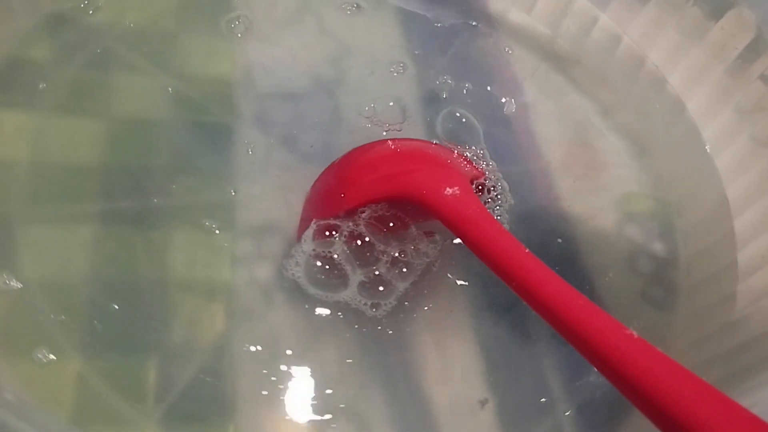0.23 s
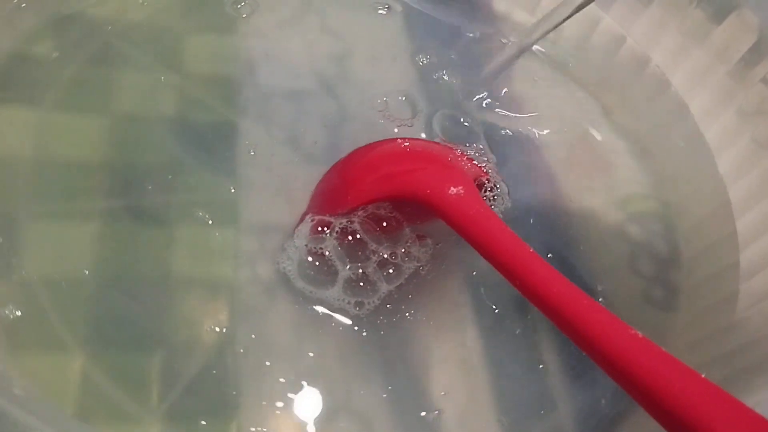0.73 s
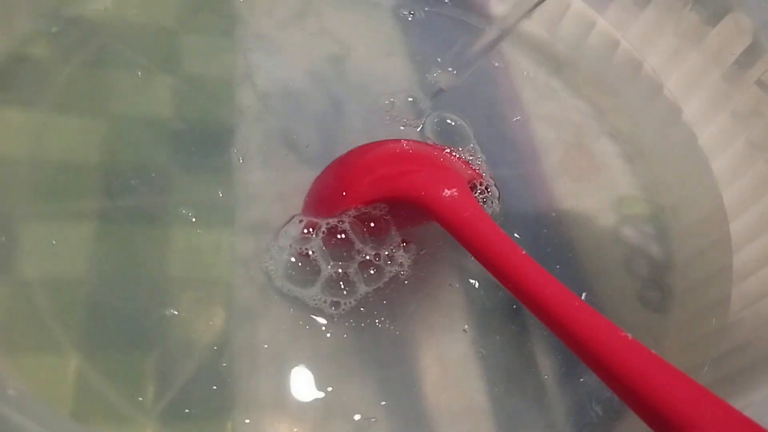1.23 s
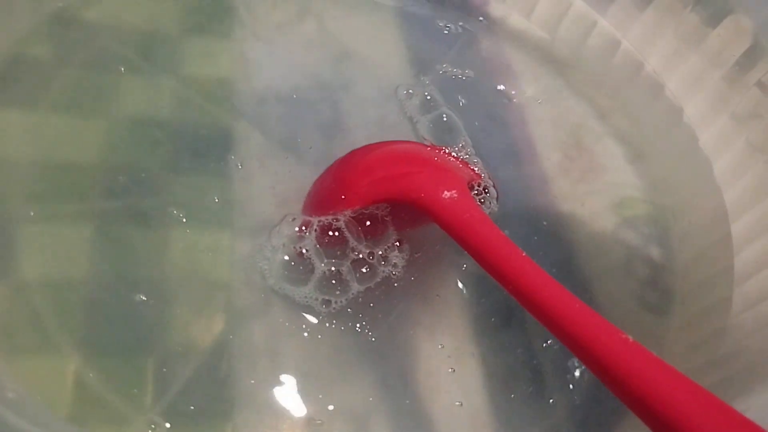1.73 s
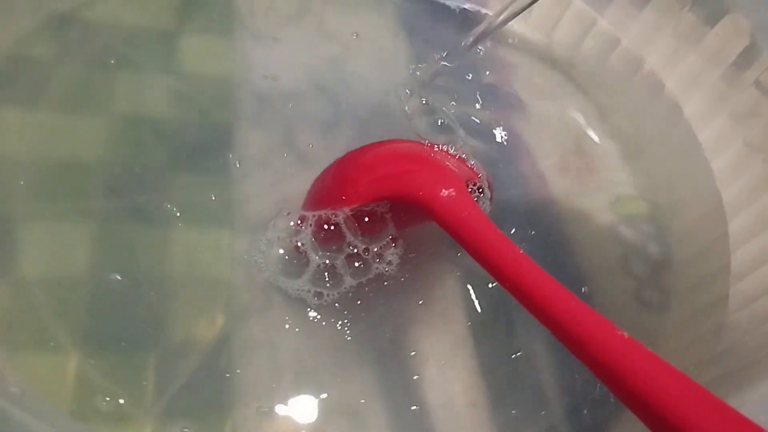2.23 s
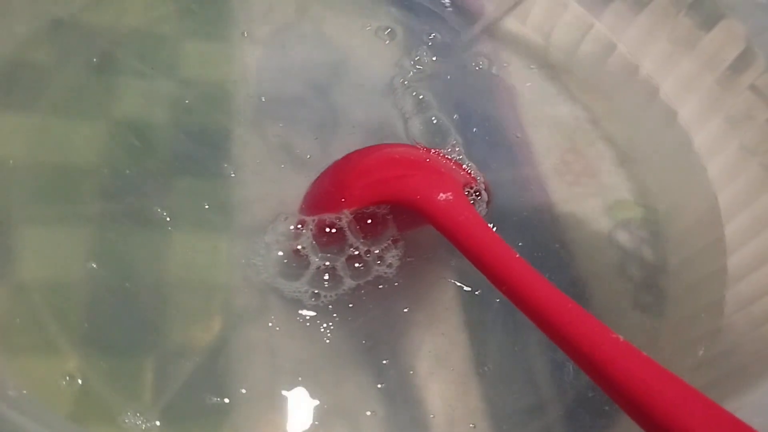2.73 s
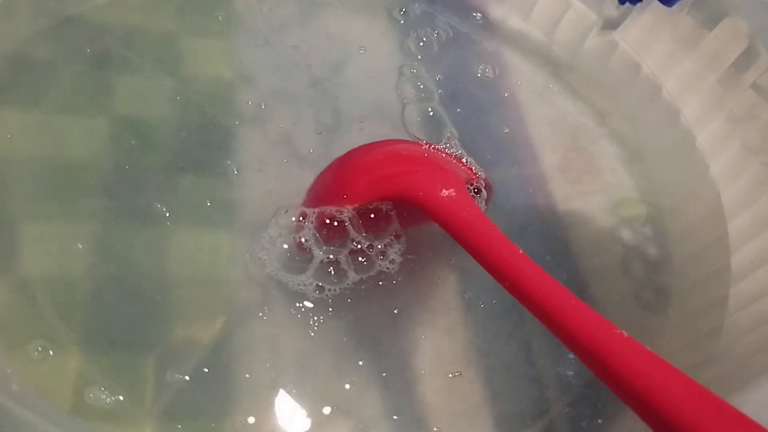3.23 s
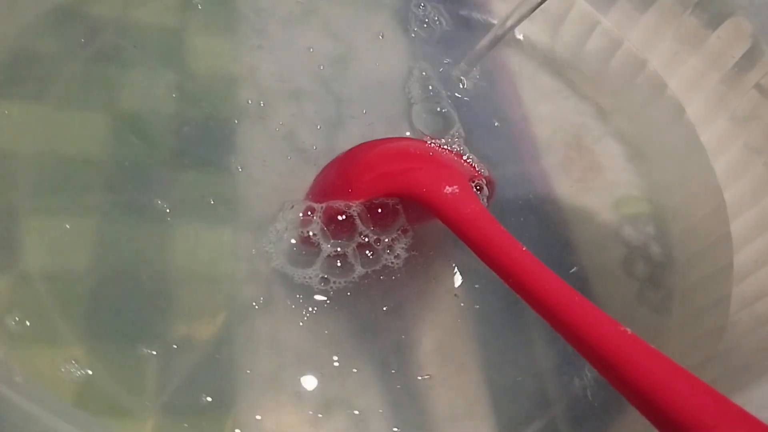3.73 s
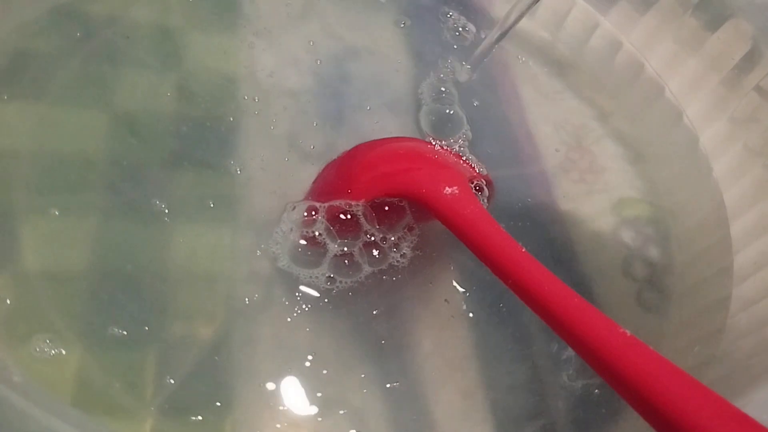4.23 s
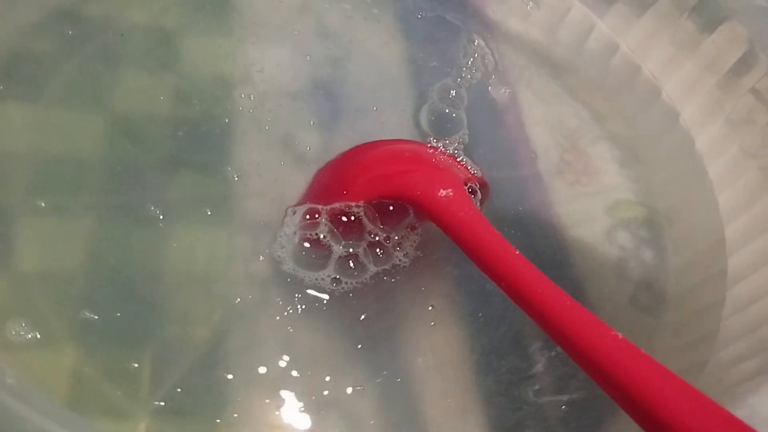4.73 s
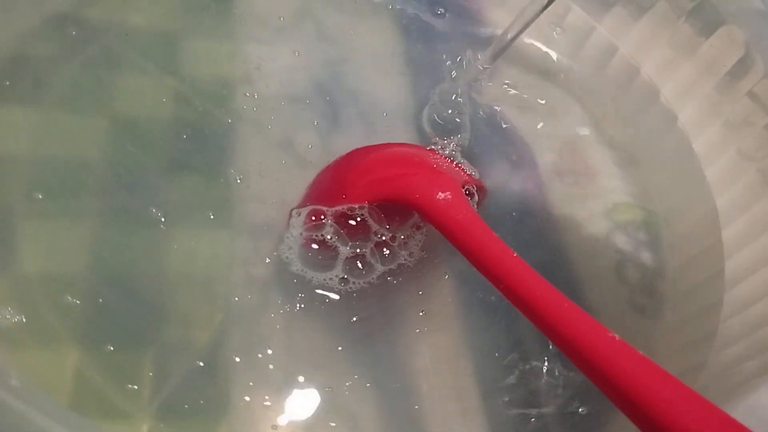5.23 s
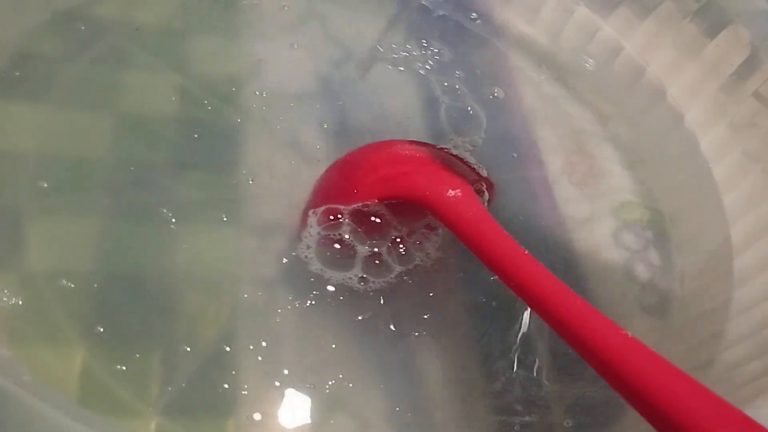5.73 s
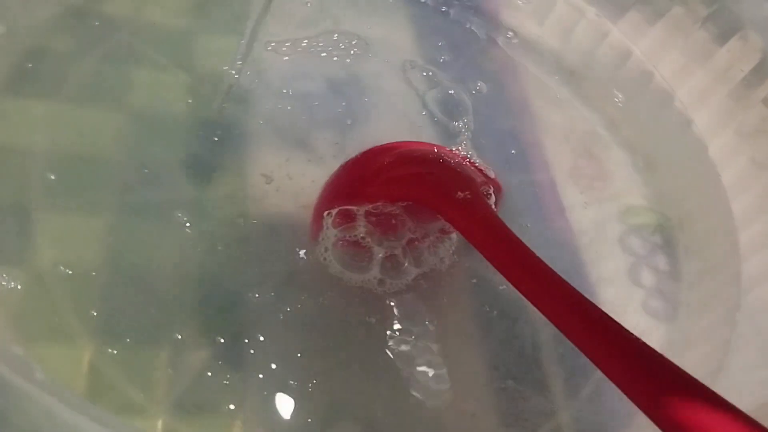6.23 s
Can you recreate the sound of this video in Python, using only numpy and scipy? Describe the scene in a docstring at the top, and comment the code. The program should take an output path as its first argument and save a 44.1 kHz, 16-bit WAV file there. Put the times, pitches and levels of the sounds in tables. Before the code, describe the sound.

Close to the microphone in a small kitchen, a plastic bottle is squeezed again and again. Its wall snaps in and out with sharp single clicks and short crumpling runs. In the first half a faint, high whistle comes from the nozzle at times, and there are a couple of low watery gulps. Tiny bubbles pop on the water, more often later, over very faint fizz, room air and a distant fridge hum.

```python
"""Faint room air, the far hum of a fridge and fizzing foam are heard throughout. Over them a plastic
bottle is squeezed close to two microphones in a small kitchen, at times with a thin nozzle whistle:
dents in its wall buckle in and out, singly and in crumpling runs, and set its modes ringing.
Bubbles burst on the water, pockets of air ring in it, and the kitchen adds a short reverberation."""
import sys
import numpy as np
from scipy import signal
from scipy.fft import rfft, irfft
from scipy.io import wavfile
from scipy.ndimage import uniform_filter1d

SR = 44100
rng = np.random.default_rng(int(sys.argv[2]) if len(sys.argv) > 2 else 0)


def bounce(signal):
    """Save signal as a 16-bit WAV file at the path given by the first command-line argument."""
    frames = np.transpose(np.atleast_2d(signal))
    limited = np.clip(frames, -1, 1)
    pcm = np.round(limited * 32767).astype(np.int16)
    wavfile.write(sys.argv[1], SR, pcm)


N = 286593


def amp(db):
    return 10 ** (np.asarray(db) / 20)


def unit_rms(x):
    return x / np.sqrt(np.mean(x ** 2) + 1e-20)


def curve_at(points, hz):
    """Interpolation along a logarithmic frequency axis."""
    f, value = np.transpose(points)
    return np.interp(np.log(hz + 1), np.log(f + 1), value)


def add(mix, start, sound):
    """Superposition: a sound joins the mix at its start in seconds."""
    part = mix[:, round(start * SR):][:, :sound.shape[1]]
    part += sound[:, :part.shape[1]]


def coloured(x, spectrum):
    """Spectral shaping of white signals, scaled to rms 1."""
    size = x.shape[-1]
    return unit_rms(irfft(rfft(x) * amp(curve_at(spectrum, np.fft.rfftfreq(size, 1 / SR))), size))


def wander(count, span):
    """Slow random modulation of rms 1: noise averaged twice over span samples."""
    return unit_rms(uniform_filter1d(uniform_filter1d(rng.standard_normal(count), span), span))


# Spectrum of the background. Each row: frequency in Hz, relative density in dB.
AIR_SPECTRUM = [(12, -30), (20, 17.5), (94, -23.5), (244, -9.5), (404, -19), (750, -21), (839, -25.5),
                (1510, -29.5), (3140, -27), (4050, -31), (5520, -29), (8170, -40), (9670, -64.5),
                (12500, -52.5), (15200, -42), (16500, -46.5)]
# Likeness of the channels. Each row: frequency in Hz, left-right correlation.
AIR_CORRELATION = [(60, 0.24), (180, 0.53), (550, -0.25), (1650, 0.33), (4970, -0.31), (15000, -0.22)]
def room_air(level_db=-59, patchy_db=0.5):
    """Partly correlated noise: kitchen air and microphone hiss, in drifting patches."""
    frames, hz = N // 256 + 5, np.fft.rfftfreq(1024, 1 / SR)
    a, b, c, d, patches = rng.standard_normal((frames, 513, 5)).T
    patches = unit_rms(uniform_filter1d(uniform_filter1d(patches, 12, 0), 14, 1))
    correlation = curve_at(AIR_CORRELATION, hz)[:, None]
    left = a + 1j * b
    right = correlation * left + np.sqrt(1 - correlation ** 2) * (c + 1j * d)
    spectra = np.array([left, right]) * amp(curve_at(AIR_SPECTRUM, hz)[:, None] + patchy_db * patches)
    return amp(level_db) * unit_rms(signal.istft(spectra, nperseg=1024, noverlap=768)[1][:, :N])


# Partials of the hum. Each row: frequency in Hz, rms level in dB.
HUM_PARTIALS = [(61, -71), (120, -69.5), (182, -66), (241, -66), (302, -82.5), (361, -77.5)]
def fridge(waver_db=2.5, drift_rad=0.98):
    """A harmonic series: mains hum and its multiples, each wavering in level and phase."""
    t = np.arange(N) / SR
    return sum(np.sqrt(2) * amp(db + waver_db * wander(N, 3700))
               * np.sin(2 * np.pi * hz * t + drift_rad * wander(N, 2000)) for hz, db in HUM_PARTIALS)


# Spectrum of the fizz. Each row: frequency in Hz, relative density in dB.
FIZZ_SPECTRUM = [(3000, -40), (6500, -12), (9900, -33.5), (15200, -13.5), (16300, -24.5)]
def fizz(level_db=-82, bursts_per_s=54, spread_db=4.0):
    """Shot noise: the smallest bubbles burst at random, each a bright tick."""
    sizes = amp(spread_db * np.minimum(rng.exponential(1, N), 4))
    bursts = sizes * (rng.random(N) < bursts_per_s / SR)
    puff = rng.standard_normal((2, 150)) * np.hanning(150)
    bursts = bursts * amp(2.7 * rng.standard_normal((2, N)))  # uneven between left and right
    ticks = signal.oaconvolve(bursts, puff, axes=1)[:, :N] * (1 + rng.standard_normal((2, N)))
    return amp(level_db) * coloured(ticks, FIZZ_SPECTRUM)


# Whistles, one list a squeeze. Each row: time in seconds, centre frequency in Hz, level in dB.
WHISTLES = [
    [(.03, 6160, -77), (.17, 6400, -63)],
    [(.32, 6350, -78), (.66, 6350, -73.5), (.86, 6970, -75), (1.2, 7300, -67), (1.4, 6900, -66),
     (1.53, 6660, -86)],
    [(2.41, 6400, -69), (2.47, 6810, -60), (2.68, 6770, -65.5), (2.77, 6970, -58.5), (2.85, 6700, -66),
     (2.91, 6750, -57)],
]
def nozzle(width_hz=300.0, flutter_db=1.0, waver_hz=90.0):
    """Narrow-band resonance: air noise whistles at a pitch that moves with the squeeze."""
    out, pole = np.zeros((2, N)), np.exp(-np.pi * width_hz / SR)
    for squeeze in WHISTLES:
        times, hz, level_db = np.transpose(squeeze)
        t = np.arange(times[0], times[-1], 1 / SR)
        noise = rng.standard_normal((2, len(t))) + 1j * rng.standard_normal((2, len(t)))
        band = signal.lfilter([1], np.convolve([1, -pole], [1, -pole]), noise)
        pitch = np.interp(t, times, hz) + waver_hz * wander(len(t), 600)
        tone = unit_rms((band * np.exp(2j * np.pi * np.cumsum(pitch) / SR)).real)
        level = amp(np.interp(t, times, level_db) + flutter_db * wander(len(t), 300))
        add(out, times[0], tone * level * signal.windows.tukey(len(t), 0.1))
    return out


def excitation_db(hz, strength_db, dent_hz, below_db, above_db, thump_db, belly_hz=432, bend=0.41):
    """Excitation spectrum of a dent: slopes meet at its pitch; in the bass the belly thumps instead."""
    octaves = np.log2((hz + 1) / dent_hz)
    steepening = 1 - bend + bend * octaves
    wall_db = strength_db + np.where(octaves < 0, below_db, -abs(above_db) * steepening) * octaves
    wall_share = np.clip(np.log2((hz + 1) / belly_hz) + 0.5, 0, 1)
    return wall_share * wall_db + (1 - wall_share) * thump_db


# Dents snapping. Each row: start in seconds, strength in dB, pitch in Hz, fall in dB per octave below
# it, fall in dB over the first octave above it, belly thump in dB, nominal left-right balance in dB.
DENTS = [(0.119, -71.5, 860, 3, 6.4, -65.5, 4), (0.1336, -86, 8900, 1, 5.5, -78, 6.8),
         (0.1825, -61, 9000, -1.5, 6, -57, 2.5), (0.1887, -48.5, 5900, 5.5, 9.6, -71, 0),
         (0.2275, -57, 5540, 2.0, 17.0, -48, 0.5), (0.2494, -51, 4540, 2.0, 15, -84, 1.2),
         (0.2919, -69, 1290, 22, 3.0, -85, 3), (0.5006, -87, 4820, 2.5, 9.3, -86, 5),
         (0.6561, -66, 1050, -3.5, 9.2, -57, 8.5), (0.746, -61, 7100, 8.5, 11, -92.5, -0.5),
         (0.795, -55.5, 2090, 6, 7.4, -54.6, 5), (0.819, -64, 2760, 9, 7, -90, 7.5),
         (1.085, -81, 7830, -0.5, 6.4, -83.5, 4), (1.1473, -49, 2500, 6.5, 6.1, -60, 4.5),
         (1.2926, -41, 2570, 5, 5.7, -50.5, 1.8), (1.2967, -65.5, 2410, 6, 10, -77, -13.5),
         (1.435, -70, 2580, -1.5, 6.4, -66.5, 4.5), (1.6713, -59.5, 596, -6, 1.4, -63.2, 1),
         (1.6875, -56, 600, 9, 2.8, -58.0, 6), (1.7006, -60, 7830, -4.5, 9.1, -51, -3),
         (1.7175, -47, 1700, 8, 11, -66, 5.5), (1.7365, -48.2, 3930, 2, 10.5, -55, 3.5),
         (1.7688, -83, 3910, -5, 6.0, -63.2, -7), (1.8459, -44.5, 2170, 9, 5, -59, 1.5),
         (1.8552, -52, 1680, 8, 11, -43.5, 7.5), (1.862, -47.5, 5540, 3.5, 20.5, -68, -3.5),
         (1.8652, -42.5, 2210, 1.5, 26, -78, 3.5), (1.8739, -69, 2090, 11, 8.7, -47, 2.7),
         (1.9394, -62, 600, 1, 3.0, -62, 3.5), (2.0079, -47, 2400, 13, 14.4, -67.5, 1.4),
         (2.0132, -51.5, 1670, 5, 11.3, -59, 6), (2.0766, -58.5, 1290, 3, 12, -62, 7.5),
         (2.0876, -53, 2020, 6, 15, -55.5, 1.5), (2.1411, -58.5, 640, 9, 5.3, -63.2, 4),
         (2.1759, -52.5, 2270, 7, 16.6, -63, 4.5), (2.1788, -52.5, 2580, 13, 8.4, -57, 1),
         (2.2625, -61.5, 597, -2, 3.4, -96, 8), (2.4034, -56, 1870, 4.5, 14.5, -66, 4.9),
         (2.5589, -66, 1950, 2.5, 5.4, -72, 3), (2.9026, -65, 1290, 6, 8.8, -84, 6),
         (2.9187, -47.5, 600, 7, 3.1, -76, -1.5), (2.9337, -57, 9000, 5.5, 6.0, -59, 6),
         (2.9567, -42.5, 3030, 6.5, 12.0, -63, 2), (2.9649, -66.5, 4190, 8.0, 12, -83.2, -4),
         (3.01, -72, 2240, 3, 3.3, -58.5, 6.5), (3.105, -83.5, 5720, -1.5, 15, -67, 4.5),
         (3.167, -79, 1290, 6, 4.0, -79, 4), (3.3874, -68.5, 1834, 1, 11, -61, 4),
         (3.8406, -73, 8960, 13, 5.0, -91, 2.5), (3.9066, -49, 2800, 1.5, 10, -71, 5.5),
         (4.0897, -92.5, 3910, -4, 1.8, -68.5, -2), (4.3218, -59.0, 2830, 3.0, 18, -76.3, 5.5),
         (4.4509, -45.5, 1005, 10.5, 6.7, -48, 3), (4.5862, -80.5, 4820, 2.5, 6.7, -97, 4.5),
         (4.702, -68, 8400, -3, 10.0, -68.5, 2), (4.723, -72, 8950, -3.0, 8.0, -61, 4.5),
         (4.7513, -63.5, 1380, -4, 1.0, -46, 4.5), (4.7637, -59.5, 600, 8, 2.7, -59, 4),
         (4.7785, -54.5, 7800, 12.5, 11.0, -64, 12), (4.783, -47, 1690, 12.5, 11, -52.5, 3.8),
         (4.7963, -37.5, 2680, 8.5, 9.4, -64, 2), (4.8505, -65.5, 600, 11, 2, -66.5, 1.3),
         (5.0256, -42.5, 3200, 5.5, 15.3, -63, 3), (5.0328, -46.5, 3650, 0.0, 14, -58, 2.5),
         (5.1827, -69.5, 640, 3, 2.9, -79, 2.3), (5.2912, -77, 5540, 3.5, 7.0, -77, 1.5),
         (5.318, -83, 3650, 4.0, 12, -93, 4.5), (5.34, -63.5, 1286, 12, 16, -60, 4),
         (5.5084, -42, 1930, 2.5, 14.4, -65.5, 2), (5.6235, -72, 9000, 11, 1.2, -83.5, 0),
         (5.9571, -42.5, 865, 9, 5.67, -45, 5.9), (6.422, -59, 2090, 9.5, 5.1, -87, 3),
         (6.4418, -57, 9000, -1.5, 1.0, -56, 0.2), (6.4827, -71.5, 3910, -2.5, 1.1, -53.5, -1),
         (6.4895, -64.5, 1050, 5.0, 4.2, -72.5, 3)]
# Modes of the bottle. Each row: frequency in Hz, relative energy in dB, 60 dB decay time in seconds.
BOTTLE_MODES = [(207.6, -8, 0.052), (337, -2, 0.036), (412, -3.5, 0.02), (572, -1.5, 0.0095),
                (763, -1.5, 0.019), (913, 0.5, 0.0096), (1355, -2.5, 0.015), (1676, -5.5, 0.0083),
                (1825, 2.5, 0.005), (2250, -1, 0.0057), (2570, -4.5, 0.0046), (2692, -3.5, 0.012),
                (3370, -11, 0.0027), (3960, -5, 0.0051), (4370, -10.5, 0.002), (5000, -8.5, 0.0045),
                (6080, -5, 0.013)]
# Spectrum of a buckle's crack. Each row: frequency in Hz, relative density in dB.
CRACK_SPECTRUM = [(2000, -0.5), (3000, 3.5), (4200, 4.5), (5000, 5), (6500, 5.5), (8500, 2), (9900, -26),
                  (11000, -5.5), (13000, -7), (15400, 0.5), (16300, -38)]
# Balance by pitch. Each row: frequency in Hz, multiplier of a dent's left-right balance.
PAN_WEIGHT = [(250, 1), (600, 0.04), (4000, 3.5), (9000, -0.9)]
def snaps(scatter_db=2.0, detune=0.064, rise_s=0.00069, buckle_s=0.003575, crack_db=34, crack_t60=0.015):
    """Snap-through buckling: a dent kicks the modes one after another, and its edge cracks as noise."""
    out, t = np.zeros((2, N)), np.arange(2048) / SR
    hz, mode_db, t60 = np.transpose(BOTTLE_MODES)[:, :, None]
    bins = np.fft.rfftfreq(len(t), 1 / SR)
    lag_s = np.array([0.00019, 0])[:, None, None]  # the bottle is nearer the right microphone
    side = np.array([0.5, -0.5])[:, None, None]
    unit_height = np.sqrt(4 * np.log(1000) / t60)  # of a damped sine of energy 1
    for start, *dent, pan_db in DENTS:
        tuning, scatter, phase, skew, order = rng.standard_normal((5, len(hz), 1))
        pitch = hz * (1 + detune * tuning)
        balance_db = side * pan_db * curve_at(PAN_WEIGHT, hz)
        height = unit_height * amp(mode_db + excitation_db(hz, *dent) + scatter_db * scatter + balance_db)
        # short waves leave different parts of the wall and reach the microphones out of phase
        phase = phase + side * 0.93 * skew * np.tanh(pitch / 850)
        age = np.maximum(t - lag_s - buckle_s * np.tanh(order / 2) ** 2, 0)
        envelope = height * amp(-60 * age / t60) * np.tanh(age / rise_s)
        modes = envelope * np.sin(2 * np.pi * pitch * age + phase)
        # however the modes interfere, the dent spends the same energy
        body = modes.sum(1) * np.linalg.norm(modes) / np.linalg.norm(modes.sum(1))
        noise = rng.standard_normal((3, len(t)))  # shared, left, right
        balance_db = side[:, 0] * pan_db * curve_at(PAN_WEIGHT, bins)
        colour = amp(curve_at(CRACK_SPECTRUM, bins) + excitation_db(bins, *dent) + balance_db)
        crack = irfft(rfft(0.22 * noise[0] + noise[1:]) * colour)
        age = np.maximum(t - lag_s[:, 0], 0)
        add(out, start, body + crack * amp(crack_db - 60 * age / crack_t60) * np.tanh(age / rise_s))
    # so small a body radiates no deep bass
    return signal.sosfilt(signal.butter(2, 140, "high", fs=SR, output="sos"), out)


# The loudest bubbles. Each row: start in seconds, peak in dB, pitch in Hz, left-right balance in dB.
FOAM_BURSTS = [(0.1381, -45, 6200, -4), (0.6779, -50.5, 15600, 2), (2.485, -44, 6800, -0.5),
               (2.8683, -44.5, 7800, -6), (3.4335, -49, 7750, 0), (3.5225, -51, 14500, 3),
               (3.7385, -56.5, 15500, 4.5), (4.0412, -57.5, 7500, 1), (4.1695, -62, 8400, 1),
               (4.2696, -60, 6400, 8), (4.6485, -49.5, 6710, -7.5), (5.2624, -45.5, 8300, -2.5),
               (5.408, -53.5, 9360, 1.5), (5.583, -51.5, 15400, 3.5), (5.7326, -43, 7500, -1),
               (5.8367, -47, 15550, -8.5), (5.905, -50, 15500, 1), (6.044, -48.5, 8210, -5.5),
               (6.11, -49.5, 15200, -8), (6.34, -49, 6040, 1)]
# Spectrum of a burst's puff. Each row: frequency in Hz, relative density in dB.
PUFF_SPECTRUM = [(3000, -23.5), (7500, -3.5), (10000, -14.5), (12500, -10), (15200, -3.5), (16300, -6.5)]
def foam(t60=0.0067, rise_s=0.0006):
    """Film rupture: a bursting bubble gives a brief damped tone and a puff of bright noise."""
    out, t = np.zeros((2, N)), np.arange(600) / SR
    puffs = coloured(rng.standard_normal((len(FOAM_BURSTS), 2, len(t))), PUFF_SPECTRUM)
    for (start, peak_db, hz, pan_db), puff in zip(FOAM_BURSTS, puffs):
        tick = (np.sin(2 * np.pi * hz * t) + puff) * amp(-60 * t / t60) * np.tanh(t / rise_s)
        tick /= abs(tick.mean(0)).max()
        add(out, start, tick * amp(peak_db) * amp([[pan_db / 2], [-pan_db / 2]]))
    return out


# The wall crumpling. Each row: start in seconds, length in seconds, creak in dB, rustle in dB.
CRUMPLE_RUNS = [(0.17, 0.11, -40.5, -44.5), (1.654, .11, -37.5, -41.5), (2.904, .075, -46.5, -44),
                (4.682, .12, -39.5, -45.5), (6.41, 0.098, -53, -62)]
# Spectra of the creak and the rustle. Each row: frequency in Hz, relative density in dB.
CREAK_SPECTRUM = [(71, -46.5), (120, -22), (226, -7.5), (583, -1), (844, -0.5), (1120, -12.5), (1530, -3.5),
                  (1930, -9.5), (5730, -12.5), (8000, -16), (10400, -49), (17600, -120)]
RUSTLE_SPECTRUM = [(2350, -29), (4000, -1.5), (6430, -6.5), (9390, -18.5), (9970, -31.5), (10800, -15.5),
                   (13300, -21), (15200, -6), (16200, -21.5), (16500, -52)]
def crumples(slips_per_s=1700, spread_db=3.5, swell_db=3.5, arch_db=15.5, grip_s=0.016, release_s=0.023,
             shared=0.45, grit=0.45):
    """Friction noise: tiny uneven slips creak through the body while skin and air hiss over it."""
    out, balance_db = np.zeros((2, N)), np.array([[2.5], [-2.5]])
    for start, length, creak_db, rustle_db in CRUMPLE_RUNS:
        t = np.arange(0, length, 1 / SR)
        held = np.clip(np.minimum(t / grip_s, (length - t) / release_s), 0, 1) ** 2
        noise = rng.standard_normal((3, len(t)))  # shared, left, right
        slips = noise * (rng.random(noise.shape) < slips_per_s / SR) * amp(spread_db * wander(len(t), 49))
        hiss = unit_rms(noise) + grit * unit_rms(slips)
        slips, hiss = (shared * rows[0] + (1 - shared) * rows[1:] for rows in (slips, hiss))
        creak = amp(creak_db + swell_db * (t / length - 0.5) + balance_db) * coloured(slips, CREAK_SPECTRUM)
        rustle = amp(rustle_db - arch_db * (2 * t / length - 1) ** 2) * coloured(hiss, RUSTLE_SPECTRUM)
        add(out, start, (creak + rustle) * held)
    return out


# Pockets of air in the water. Each row: start in seconds, level in dB, first and last pitch in Hz,
# 60 dB decay time in seconds.
AIR_POCKETS = [(0.2308, -5.5, 370, 352, 0.02), (0.5, -42.5, 3700, 3800, 0.015),
               (.8188, -48, 3300, 3700, 0.0069), (2.088, -17, 370, 328, 0.052),
               (2.263, -38.5, 844, 715, 0.18), (2.386, -41, 800, 760, 0.041),
               (3.609, -52.5, 917, 918, 0.094), (4.09, -46, 428, 455, 0.047),
               (6.4424, -5.5, 5540, 5760, 0.0063), (6.4835, -36, 5640, 5740, 0.0065)]
def gulps(glide_s=0.0081):
    """Bubble resonance: a pocket of air rings as one damped tone that slides as it moves."""
    out, t = np.zeros((2, N)), np.arange(6000) / SR
    for start, level_db, first_hz, last_hz, t60 in AIR_POCKETS:
        hz = last_hz + (first_hz - last_hz) * np.exp(-t / glide_s)
        envelope = amp(level_db - 60 * t / t60) * np.tanh(t * last_hz / 4)
        add(out, start, np.sin(2 * np.pi * np.cumsum(hz) / SR) * envelope * amp([[1.5], [-1.5]]))
    return out


# Decay of the room. Each row: frequency in Hz, reverberation time in seconds.
ROOM_T60 = [(200, 0.24), (600, 0.21), (950, 0.18), (1500, 0.15), (2100, 0.2), (3600, 0.21), (5500, .18),
            (9000, 0.25), (15000, 0.18)]
# Colour of the tail. Each row: frequency in Hz, relative gain in dB.
WALL_COLOUR = [(200, -0.5), (750, 4.5), (1500, -2), (2800, -3), (5000, -2), (9000, -2.5), (15000, 1.5)]
def kitchen(near, gap_s=0.0045, late_db=-37.5, late_t60=1.0, crossfade_hz=3.1):
    """Reverberation: sparse reflections of random sign decay band by band; three tails take turns."""
    out, size = np.zeros((2, N)), SR * 2 // 5
    grid = np.arange(round(gap_s * SR), size - 20, 20)
    open_side = near[:1]  # the walls return the bottle's open side to both microphones
    for turn in range(3):
        taps, shape = np.zeros((2, size)), (2, len(grid))
        np.put_along_axis(taps, grid + rng.integers(0, 20, shape), rng.choice([-1., 1.], shape), 1)
        hz, t, spectra = signal.stft(taps, SR, nperseg=256)
        decay = amp(-60 * t / curve_at(ROOM_T60, hz)[:, None])
        decay += amp(late_db - 60 * t / late_t60)  # the rooms beyond the door ring on faintly
        tail = signal.istft(spectra * decay * amp(curve_at(WALL_COLOUR, hz)[:, None]), SR, nperseg=256)[1]
        weight = np.sqrt(2 / 3) * np.cos(2 * np.pi * (np.arange(N) / SR * crossfade_hz + turn / 6))
        out += signal.fftconvolve(open_side * weight, tail / np.linalg.norm(tail[0]), axes=1)[:, :N]
    return out


def centred_bass(x, corner_hz=380.0):
    """Low-frequency coherence: long waves reach both microphones alike."""
    lowpass = 1 / (1 + (np.fft.rfftfreq(N, 1 / SR) / corner_hz) ** 4)
    bass_side = irfft(rfft(x[0] - x[1]) * lowpass, N) / 2
    return x - np.array([bass_side, -bass_side])


def scene(reverb_db=-8.5):
    """Superposition of the background, the whistle, and the bottle with its reverberation."""
    near = fizz() + snaps() + foam() + crumples() + gulps()
    bottle = centred_bass(near + amp(reverb_db) * kitchen(near))
    return room_air() + fridge() + nozzle() + bottle


def record(dry, edge_hz=16500):
    """Band limiting: a steep low-pass filter removes the highest treble."""
    return signal.oaconvolve(dry, signal.firwin(511, edge_hz, window=("kaiser", 9), fs=SR)[None], "same")


dry = scene()
out = record(dry)
bounce(out)
```